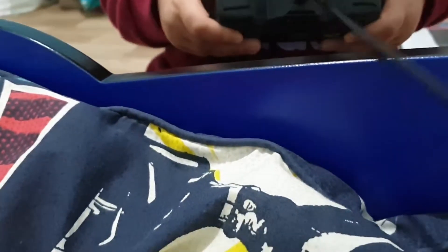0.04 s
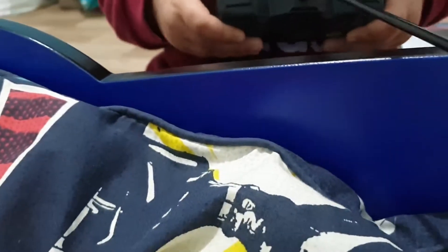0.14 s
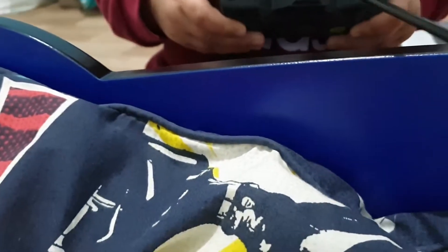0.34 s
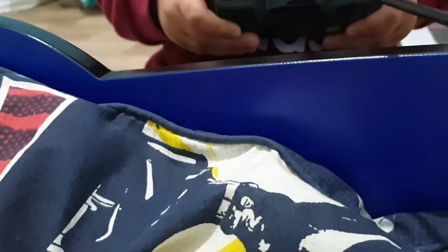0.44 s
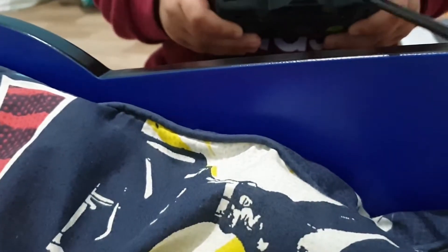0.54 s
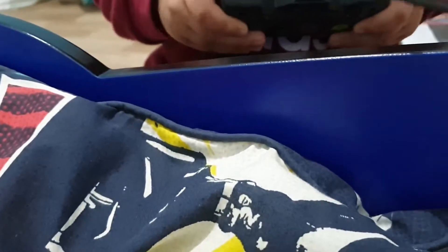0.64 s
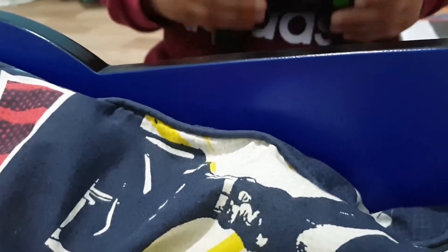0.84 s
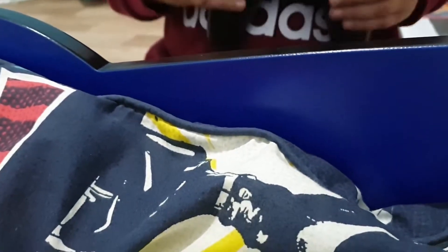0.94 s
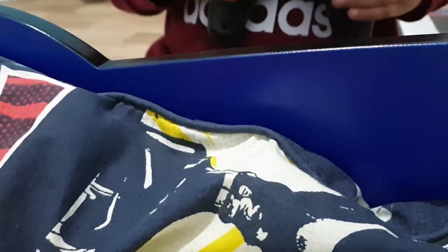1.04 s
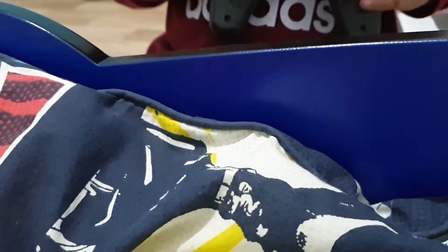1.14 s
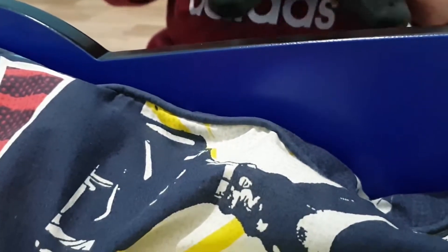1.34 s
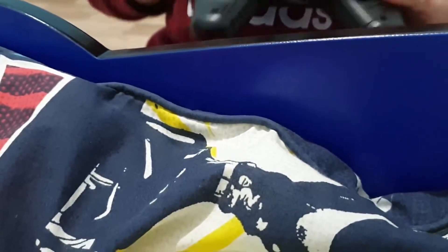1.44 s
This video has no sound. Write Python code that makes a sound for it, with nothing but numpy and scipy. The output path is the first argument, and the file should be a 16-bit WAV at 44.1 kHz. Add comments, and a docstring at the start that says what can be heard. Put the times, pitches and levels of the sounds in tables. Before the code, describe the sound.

A hollow plastic toy remote clicks and rattles as hands turn it over in a small room. Loose parts scrape in uneven clusters, with finger rubbing and soft low bumps, close to the microphone on the left.

```python
"""In a small room, a hollow plastic toy remote is turned over in two hands, close to and left of a pair
of microphones. Fingers rub the case (friction noise) and low bumps and thumps come through the table
(structure-borne sound). Loose parts click, rattle and scrape against the shell and a joint creaks once;
each contact excites the shell's damped modes, whose sound reverberates briefly over a faint room tone."""
import sys
import numpy as np
from scipy import signal
from scipy.fft import rfft, irfft
from scipy.io import wavfile

SR = 44100
rng = np.random.default_rng(int(sys.argv[2]) if len(sys.argv) > 2 else 0)


def unload_wav(signal):
    """Save mono or channel-first audio to the path in sys.argv[1] as 16-bit WAV at rate SR, clipped to [-1, 1]."""
    wavfile.write(
        sys.argv[1],
        SR,
        np.round(np.clip(np.atleast_2d(signal).T, -1, 1) * 32767).astype(np.int16),
    )


N = 66150
LAG_S = 0.00032   # a sound from the left reaches the right microphone this much later
# Grip of the hands on the case: (time [s], rub level [dB], bump level [dB])
HANDS = [(0.0, -35, -32), (0.021, -43.5, -59), (0.151, -52.5, -41.5), (0.212, -51.5, -52),
         (0.312, -46.5, -57.5), (0.438, -60, -58.5), (0.48, -58, -57), (0.6, -41, -46), (0.66, -52, -74),
         (0.792, -52, -44), (0.836, -45.5, -56), (0.948, -50, -56), (0.985, -41, -47.5),
         (1.102, -39.5, -48), (1.114, -48.5, -58.5), (1.378, -61, -66.5), (1.47, -71.5, -69),
         (1.5, -73.5, -69)]


def amp(db):
    """Decibels as an amplitude ratio."""
    return 10 ** (np.asarray(db) / 20)


def unit_rms(x):
    """Normalisation to unit mean power."""
    return x / np.sqrt(np.mean(x ** 2) + 1e-20)


def at_hz(curve, hz):
    """Interpolation on a logarithmic frequency axis."""
    frequencies, values = np.transpose(curve)
    return np.interp(np.log(hz), np.log(frequencies + 1), values)


def drift(corner_hz):
    """Random modulation: low-passed noise of unit spread."""
    step = 40   # samples between values
    pole = np.exp(-2 * np.pi * corner_hz * step / SR)
    slow = signal.lfilter([1], [1, -2 * pole, pole ** 2], rng.standard_normal(N // step + 502))[500:]
    return np.interp(np.arange(N) / step, np.arange(len(slow)), unit_rms(slow))


def pair(shared, own, coherence):
    """Partial coherence: the right channel mixes the left signal with an independent one."""
    return np.array([shared, coherence * shared + np.sqrt(1 - coherence ** 2) * own])


def butter(x, order, hz, kind):
    """Butterworth filtering: a maximally flat passband."""
    return signal.sosfilt(signal.butter(order, hz, kind, fs=SR, output="sos"), x)


def ring(force, hz, t60):
    """Damped harmonic oscillator: a unit impulse rings with amplitude 1."""
    r, w = amp(-60 / (t60 * SR)), 2 * np.pi * hz / SR
    return signal.lfilter([0, np.sin(w)], [1, -2 * r * np.cos(w), r * r], force + 1e-18)


def banded_noise(spectrum, flicker_db, coherence):
    """Amplitude modulation: third-octave noise bands flicker, partly in step; total rms 1."""
    out, together = 0, drift(38)
    bottom, top = spectrum[0][0], spectrum[-1][0]
    edges = bottom * 2 ** np.arange(0, np.log2(top / bottom) + .1, 1 / 3)
    white = rng.standard_normal((2, 2, N))
    for k, (low, high) in enumerate(zip(edges, edges[1:])):
        band = butter(white[k % 2], 2, [low, high], "band")
        db = at_hz(spectrum, np.sqrt(low * high)) + flicker_db * (together + 0.72 * drift(17))
        out = out + amp(db) * pair(*band, coherence)
    return unit_rms(out)


def finger_rub(gain_db=-5):
    """Sliding friction: fingers on the case make broadband noise that follows the grip."""
    # Friction spectrum: (frequency [Hz], relative density [dB])
    spectrum = [(88, -46), (150, -26.5), (222, -14.5), (448, -19), (504, -6.5), (730, -13), (905, -12),
                (1900, -7.5), (3100, -13.5), (4240, -13), (9260, -21.5), (14500, -18), (16000, -30)]
    times, rub_db, _ = np.transpose(HANDS)
    envelope = amp(gain_db + np.interp(np.arange(N) / SR, times, rub_db))
    return envelope * banded_noise(spectrum, flicker_db=1.2, coherence=0.55)


def low_bumps(gain_db=-0.8):
    """Structure-borne sound: handling comes through the table as uneven low noise."""
    # Bump spectrum: (frequency [Hz], relative density [dB])
    spectrum = [(15, -51), (25, -6), (75, 9.5), (156, -5), (188, 2), (222, -7.5), (300, 7), (390, -26),
                (660, -120)]
    times, _, bump_db = np.transpose(HANDS)
    envelope = amp(gain_db + np.interp(np.arange(N) / SR, times, bump_db))
    return envelope * banded_noise(spectrum, flicker_db=4.5, coherence=0.94)


def room_tone():
    """Stationary background noise, strongest in the bass."""
    # Background spectrum: (frequency [Hz], relative density [dB])
    spectrum = [(24, -32), (40, 2), (87, -10.5), (237, -14.5), (283, -44.5), (354, -19.5), (1410, -39.5),
                (2210, -48), (16000, -48.5)]
    return amp(-65) * banded_noise(spectrum, flicker_db=0, coherence=0.45)


def clicks():
    """Impact excitation: loose parts strike the shell with a force that dies at once."""
    # Impacts: (time [s], energy of thud, knock, hollow, wall, rib, edge, tick [dB each],
    # place [1 left, -1 right], fade [ms])
    impacts = [(0.001, -27, -23, -23, -8, -43, -15.5, -35, 0.96, 4),
               (0.0095, -18.5, -30, -29, -17, -37, -18, -10.5, 0.9, 1.06),
               (0.027, -20.5, -39.5, -46, -38.0, -42.0, -47, -47, 0.57, 0.89),
               (0.045, -47, -27, -35, -47, -40, -47, -48.0, -0.1, 0.34),
               (0.057, -14.5, -20, -39, -19.5, -29, -36.5, -32, -0.38, 1.6),
               (0.128, -19, -27.5, -36, -30, -37, -51, -45, -0.13, 2.1),
               (0.165, -21, -51.0, -53, -27, -19.5, -16.5, -14, 1, 0.79),
               (0.172, -46, -34, -54, -47, -32, -29, -28, 0.82, 0.99),
               (0.206, -35, -23, -17, -12.5, -21, -28, -24, 0.89, 3.3),
               (0.26, -32, -21, -18, -14, -35, -24, -17.5, 0, 0.9),
               (0.2755, -23.5, -40, -6, -9.5, -11, -8, -8.5, 0.82, 3.1),
               (0.298, -38, -25, -12.5, -17, -24, -30, -10.5, 0, 1),
               (0.313, -35, -29, -38, -16, -23, -22, -19, 0.77, 3.1),
               (0.37, -24, -32, -51, -51, -50, -49, -32, 0.87, 1.4),
               (0.456, -28.5, -27.5, -24, -21, -31, -26, -43, 0.89, 2.4),
               (0.4725, -38, -33, -24, -25, -27, -14, -23, 0.55, 1.2),
               (0.4795, -28, -32, -15, -24, -20.5, -20, -17.5, 0, 0.96),
               (0.4845, -19, -17.5, -17, -8.5, -10.5, -10, -11.5, 1, 1.2),
               (0.4995, -48, -44, -28, -25, -31, -35, -23, 0.84, 0.41),
               (0.5095, -43, -39, -14, -11, -3, 4, -2.5, 0.84, 1.16),
               (0.5245, -21, -17, -4, -5.5, -6, -6, -8.5, 0.9, 1.4),
               (0.5405, -41, -20.5, -12, -26, -43, -44, -37, 0.12, 1.2),
               (0.56, -6, -8.5, 5, 7, -3, 3.5, 4, 0.91, 1.95),
               (0.583, -10, -10.5, -28, 4, -3.5, 0, 3.5, 0.91, 2.7),
               (0.594, -39, -44, -21, -23, -13.5, -1.5, -15, 1, 0.72),
               (0.717, -16.5, -24, -19, -14, -32.5, -34, -39, -0.83, 0.52),
               (0.747, -56, -48, -44, -42, -23, -21.5, -29, 0.86, 1),
               (0.76, -18, -24, -13, -6, -22, -27, -24, -0.82, 1.2),
               (0.781, -21, -41, -14.5, -29, -19.5, -12.5, -10, 0.76, 2),
               (0.799, -22, -30, -45, -35, -39, -26, -20.5, 0.56, 0.96),
               (0.842, -23, -25.5, -11, -17.5, -19, -23, -9.5, 0.16, 1.1),
               (0.887, -40.0, -33, -27, -16, -26, -34, -19, 0.85, 2.3),
               (0.8995, -17.5, -26.5, -27, -13.5, -13, -22, -19, 1, 1.8),
               (0.904, -25, -33.5, -31, -14.5, -18, -12.5, -12, 0.99, 6.1),
               (0.924, -49, -51, -38, -27, -44, -25, -25, 1, 3.8),
               (0.949, -24, -37.5, -42, -19.5, -40, -50.5, -42, 1, 0.74),
               (0.961, -23, -37.5, -37, -13, -16, -33, -25, 1, 2.5),
               (0.965, -14.5, -41.5, -32, -14, -22, -14.5, -14.5, 0.97, 1.9),
               (0.986, -18, -45.5, -21, -14, -29.5, -20, -19, 1, 1.8),
               (0.998, -28, -33, -30.5, -22, -15.5, -16, -17, 0.66, 1.7),
               (1.006, -40, -41, -25, -17, -16, -20, -28, 0.92, 1.4),
               (1.017, -45, -37, -26, -12.5, -18.5, -23, -19, 1, 2.6),
               (1.0395, -31, -23, -39, -11.5, -32, -23, -21.5, 0.96, 1.2),
               (1.054, -18, -37, -38, -12, -12.5, -23, -22, 1, 1.7),
               (1.057, -43, -41.5, -39, -33, -33.5, -9.5, -10.5, 0.85, 1.2),
               (1.063, -18, -14.5, -8, -11, -18, -9, -18, 1, 3.9),
               (1.069, -23, -21.5, -10.5, -1, -14, -29, -7, 0.87, 3.9),
               (1.081, -18, -25, -6, 0.5, -11, -11, -16, 0.93, 1.7),
               (1.088, -38, -35, -30, -12, -20, -14.5, -19, 1, 1.5),
               (1.122, -31.5, -26.5, -25, -19, -27, -22, -21, 0.67, 2.9),
               (1.144, -33, -25, -22, -17.5, -13.5, -18, -16.5, 0.92, 4.9),
               (1.181, -26.5, -25, -26.5, -19, -29, -22.5, -28, 0.94, 1.7),
               (1.238, -27.5, -22, -29, -12, -26.5, -25, -33, 0.93, 1.3),
               (1.25, -31, -18.5, -29, -2, -24, -28, -24, 1, 0.49),
               (1.2525, -17, -16, -13.5, -17.5, -15, 0, -17.5, 0.82, 0.56),
               (1.256, -34, -27.5, -33, -20, -15, -20, -18, 0.49, 0.33),
               (1.262, -51, -36, -29, -22, -26, -20, -27, 0.86, 1.5),
               (1.324, -29, -23, -23.5, -23.5, -31.5, -35, -40, .8, 1.8)]
    return [(*contact, 0, fade_ms) for *contact, fade_ms in impacts]


def shell(contacts, rise_ms=0.73, spread_db=2):
    """Modal superposition: each contact, a burst of tiny touches, rings all seven parts of the shell.
    Contacts: (time [s], seven energies [dB], place, hold [ms], fade [ms])."""
    # Modes of each part, thud to tick: (frequency [Hz], relative level [dB], T60 [s])
    parts = [
        [(193.3, -5, 0.11), (248, -0.5, 0.015), (340.4, 6, 0.034), (423, 0, 0.02)],
        [(515, -2, 0.018), (670, 1.5, 0.028), (852, -1.5, 0.023)],
        [(942, -8.5, 0.0065), (1165, -4, 0.0133), (1590, 0, 0.007)],
        [(1816, 4, 0.024), (2121, 5.5, 0.012), (2488, -2.5, 0.012)],
        [(3146, -1.5, 0.03), (3734, 3.5, 0.014), (4415, 11, 0.008)],
        [(5623, -1, 0.019), (6220, 5, 0.0078), (6990, 9, 0.0061)],
        [(10120, 1.5, 0.0035), (11200, 6.5, 0.0037), (12670, 10, 0.0015), (14800, 5.5, 0.0069)],
    ]
    # Likeness at the two microphones: (frequency [Hz], coherence [0 to 1])
    coherence = [(150, .97), (2500, .97), (6000, .82), (15000, .5)]
    # Acoustic shadow for a source on the left: (frequency [Hz], left minus right [dB])
    shadow = [(200, 6.5), (380, 6.5), (700, 15), (1290, 2.5), (2380, 4), (4400, 8), (8120, 9), (15000, 6)]
    starts, *energies_db, places, hold_ms, fade_ms = np.transpose(contacts)[:, :, None, None]
    burst_len, ring_len = 2600, 4000   # samples
    ms = 1000 * np.arange(burst_len) / SR
    envelope = (1 - np.exp(-ms / rise_ms)) * np.exp(-np.maximum(ms - hold_ms, 0) / fade_ms)
    ringing = 0   # axes: contact, side, sample
    for modes, energy_db in zip(parts, energies_db):
        part = 0
        for hz, db, t60 in modes:
            noise = rng.standard_normal((2, len(contacts), burst_len))
            touches = pair(*noise, at_hz(coherence, hz)).swapaxes(0, 1)
            force = np.pad(envelope * touches, [(0, 0), (0, 0), (0, ring_len - burst_len)])
            mode = ring(force, hz, t60)
            mode /= np.linalg.norm(mode, axis=2, keepdims=True)
            # each contact excites the modes differently
            mode_db = db + spread_db * rng.standard_normal(starts.shape)
            shadow_db = places * [[0], [at_hz(shadow, hz)]]
            part = part + amp(mode_db - shadow_db) * mode
        part = butter(part, 2, [modes[0][0] / 1.25, min(modes[-1][0] * 1.25, 18000)], "band")
        part /= np.linalg.norm(part[:, :1], axis=2, keepdims=True)   # unit energy on the left
        ringing = ringing + amp(energy_db) * part
    out = np.zeros((2, N + 2 * ring_len))
    for start, place, sound in zip(starts.flat, places.flat, ringing):
        for side, delay in enumerate([0, place * LAG_S]):
            i = round(max(start + delay, 0) * SR)
            out[side, i:i + ring_len] += sound[side]
    return out[:, :N]


def reverberation(x, t60=0.28, treble_t60=0.056, gap_s=0.0029):
    """Diffuse field: dense reflections, independent on each side, decay faster in the treble."""
    t = np.arange(SR // 2) / SR
    reflections = rng.standard_normal((2, len(t))) * np.clip(t / gap_s - 1, 0, 1)
    low = butter(reflections, 1, 3000, "low")
    tail = low * amp(-60 * t / t60) + (reflections - low) * amp(-60 * t / treble_t60)
    tail /= np.sqrt(np.sum(tail ** 2) / 2)
    return signal.fftconvolve(x.mean(axis=0)[None], tail, axes=1)[:, :N]


def table_thumps(push_s=0.0018, t60_cycles=21):
    """Free vibration: each soft push leaves one low mode of the table humming."""
    # Thumps: (time [s], frequency [Hz], level [dB])
    thumps = [(.068, 198, -34), (0.13, 78.4, -33.5), (0.373, 200, -46.5), (0.762, 354, -37.5),
              (0.976, 83, -38), (1.15, 277, -44)]
    out, pole = 0, np.exp(-1 / (push_s * SR))
    for start, hz, db in thumps:
        strength = amp(db) * np.hypot(1, 2 * np.pi * hz * push_s)   # offsets the softening at this pitch
        impulse = strength * (np.arange(N) == int(start * SR))
        push = signal.lfilter([1 - pole], [1, -pole], impulse + 1e-18)
        out = out + ring(push, hz, t60_cycles / hz)
    return out


def creak(start_s=0.2146, period_s=0.0071, fade_ms=1.7):
    """Stick-slip friction: a joint on the left slips six times, its energy climbing to higher modes."""
    # First and last slip: (energy of thud, knock, hollow, wall, rib, edge, tick [dB each])
    end_slips = [
        [-38, -24, -5, -17, -21, -32, -33.5],
        [-42, -31.5, -7, -11, -16, -30, -39],
    ]
    slips = np.linspace(*end_slips, 6)
    return [(start_s + period_s * k, *db, 1, 0, fade_ms) for k, db in enumerate(slips)]


def scrapes(fade_ms=10):
    """Sustained excitation: a sliding part holds its contact with the shell before it fades."""
    # Slides: (time [s], seven energies, thud to tick [dB], place [1 left, -1 right], hold [ms])
    slides = [(.214, -31, -27, -21, -15.5, -11.5, -9, -9.5, 1, 26.5),
              (.564, -31.5, -25, -11, -2.5, -8.5, -7, -9, 1, 22),
              (.586, -17, -32, -23, -11, -8.5, -14, -7, 0.73, 7.5),
              (.846, -21, -31, -36, -18, -25, -23, -18, 1, 26),
              (.982, -25, -32, -30, -10, -9.5, -8, -12, 1, 27),
              (1.056, -16, -26, -13, -4, -13, -16, -27, 0.92, 24)]
    return [(*slide, fade_ms) for slide in slides]


def lean_left(db):
    """Level difference: left and right gains that lie db apart."""
    return amp([[db / 2], [-db / 2]])


def scene():
    """Superposition at two microphones: level and arrival-time differences put the toy on the left."""
    rub, bumps, air = finger_rub(), low_bumps(), room_tone()
    toy = shell(clicks() + creak() + scrapes())
    left, right = lean_left(5.5) * (rub + air) + lean_left(2) * (bumps + table_thumps())
    delay = np.exp(-2j * np.pi * np.fft.rfftfreq(N, 1 / SR) * LAG_S)
    late_right = irfft(rfft(right) * delay, N)
    return np.array([left, late_right]) + toy + amp(-13.5) * reverberation(toy)


def record(dry):
    """Band limiting: the deepest bass is thinned and the top is cut steeply."""
    thinned = butter(dry, 2, 39, "high")
    return signal.sosfilt(signal.cheby2(14, 70, 17100, fs=SR, output="sos"), thinned)


dry = scene()
out = record(dry)
unload_wav(out)
```